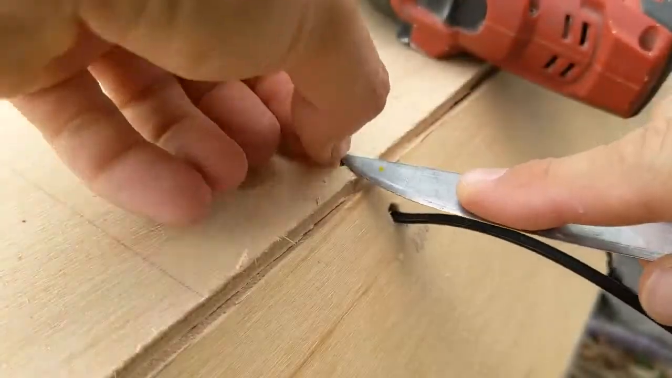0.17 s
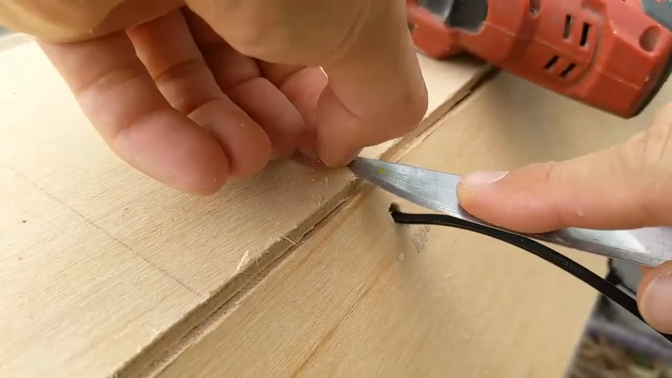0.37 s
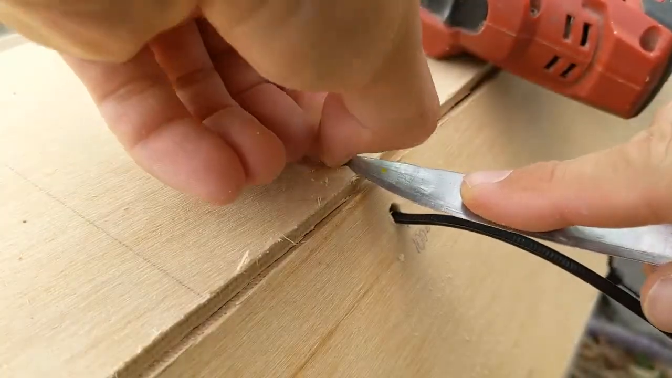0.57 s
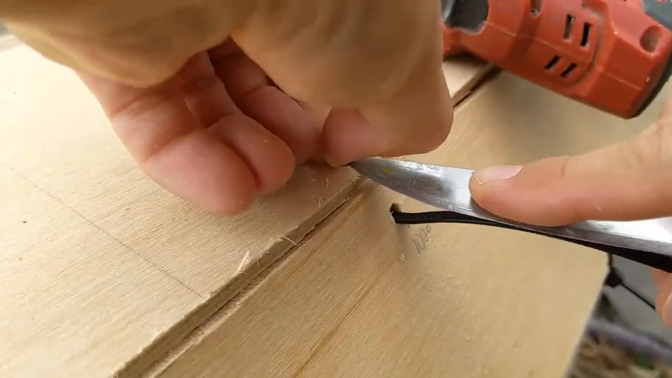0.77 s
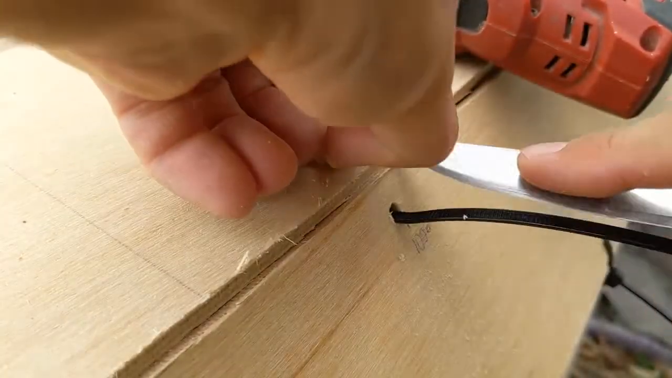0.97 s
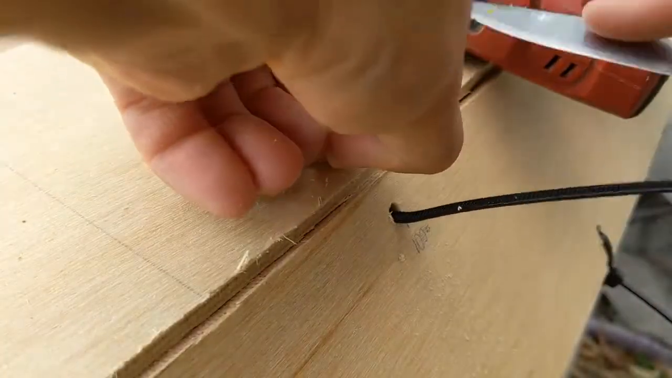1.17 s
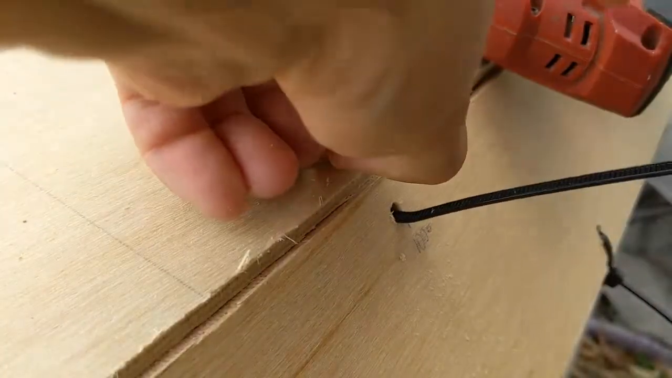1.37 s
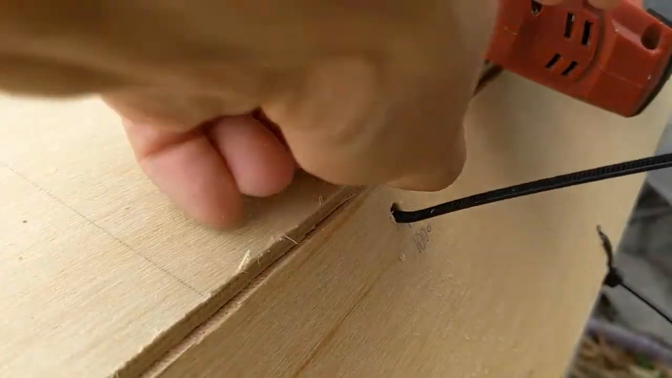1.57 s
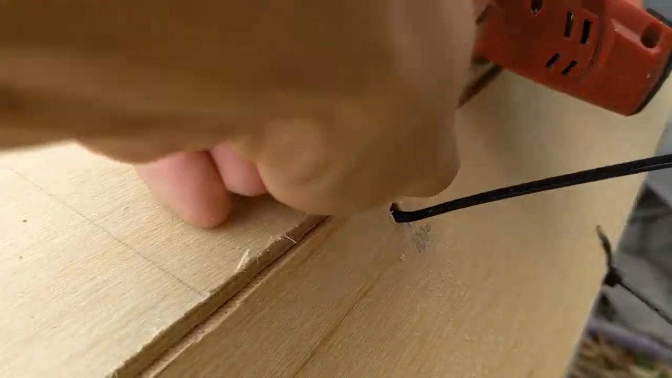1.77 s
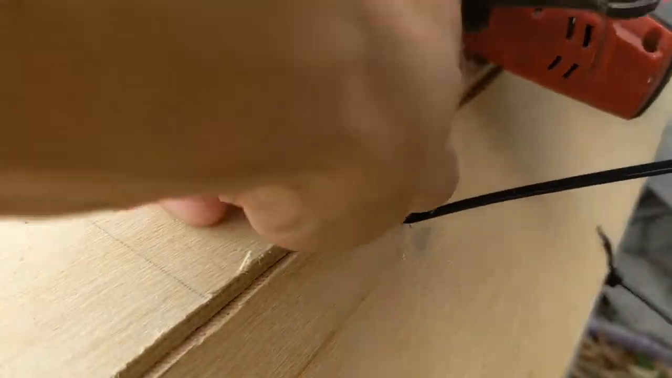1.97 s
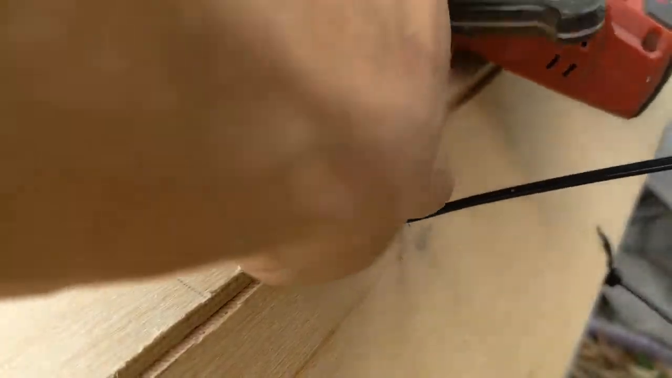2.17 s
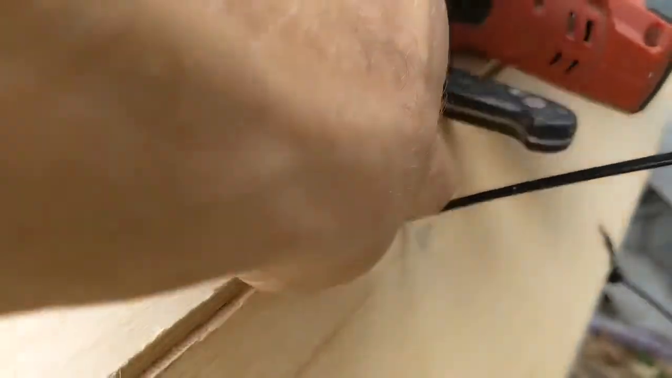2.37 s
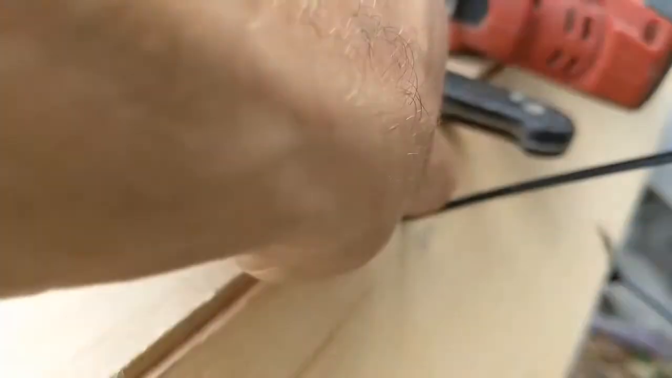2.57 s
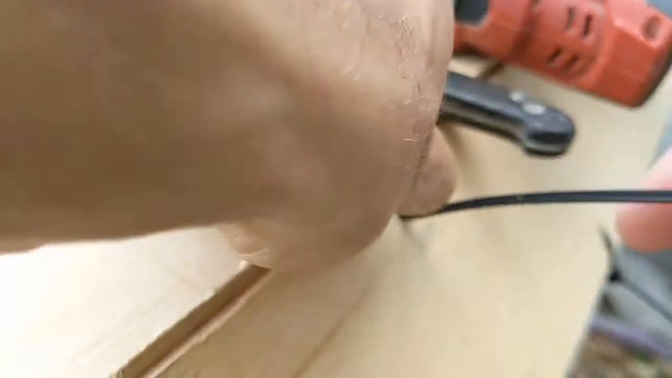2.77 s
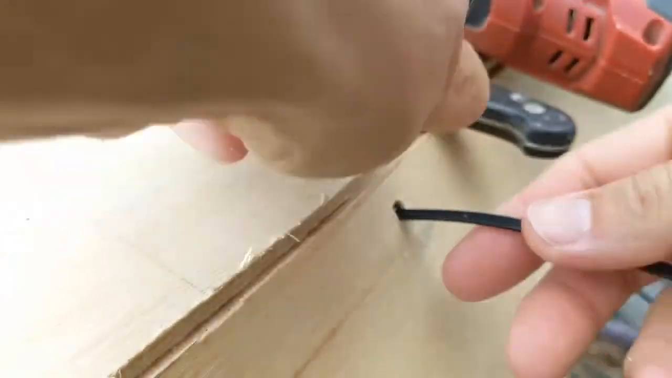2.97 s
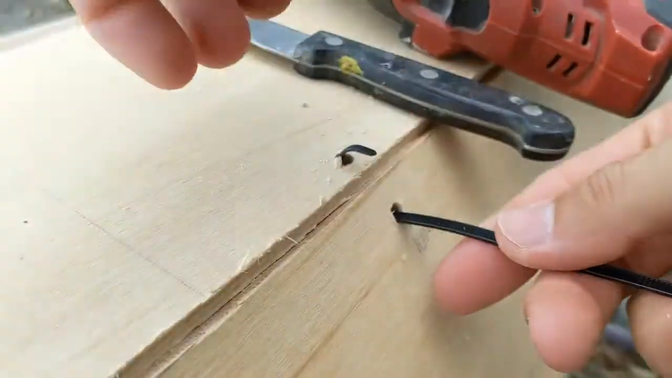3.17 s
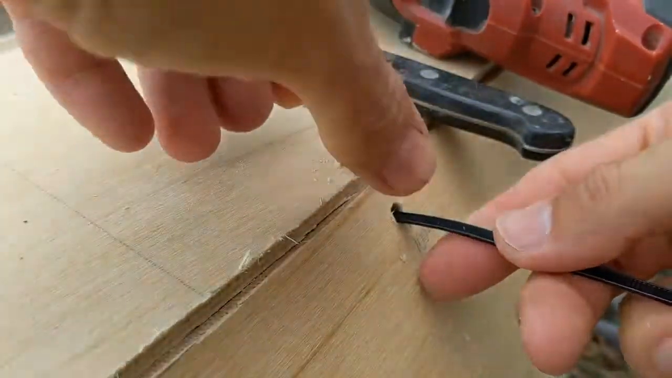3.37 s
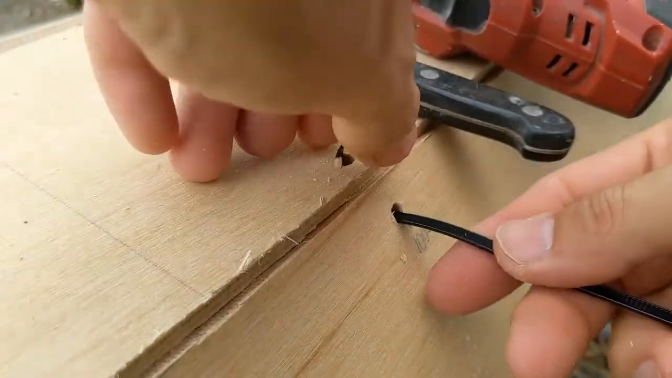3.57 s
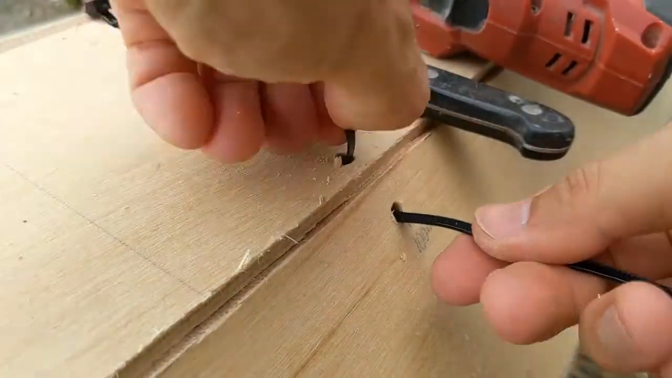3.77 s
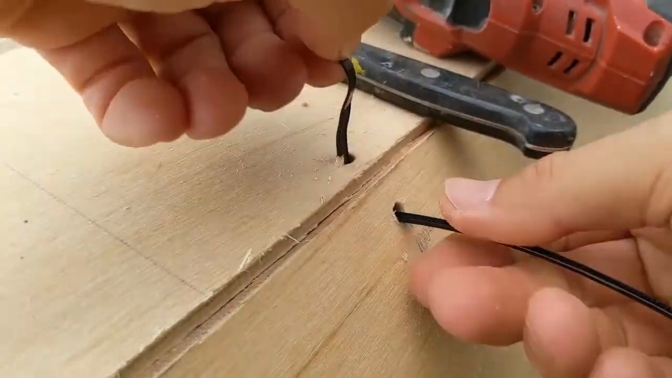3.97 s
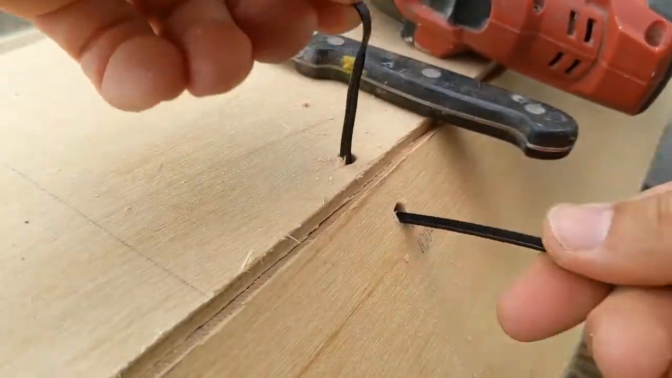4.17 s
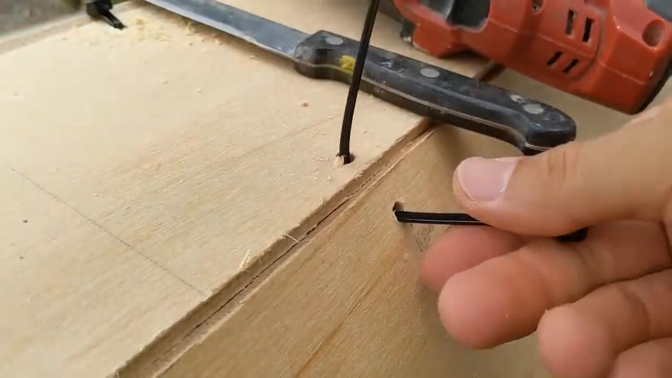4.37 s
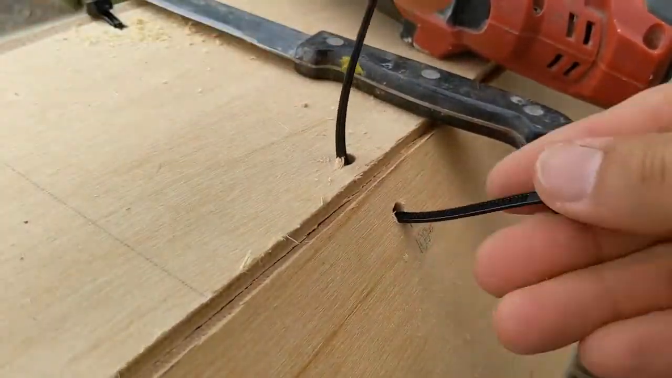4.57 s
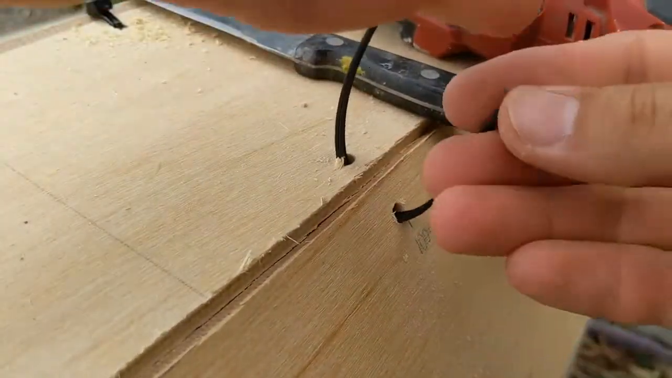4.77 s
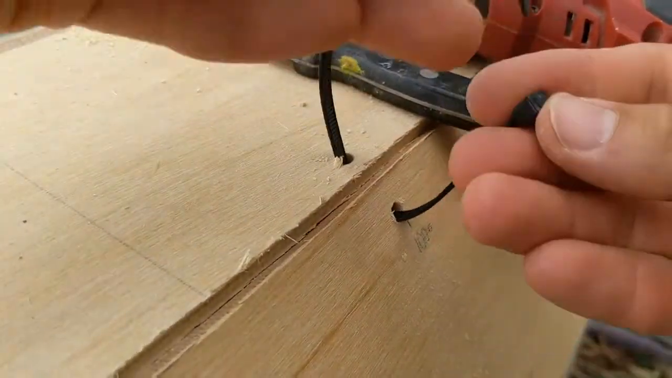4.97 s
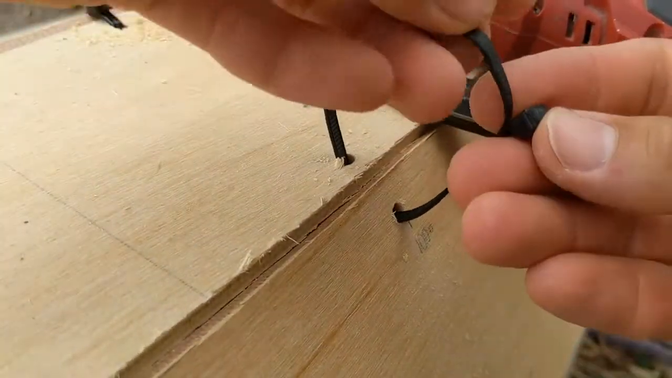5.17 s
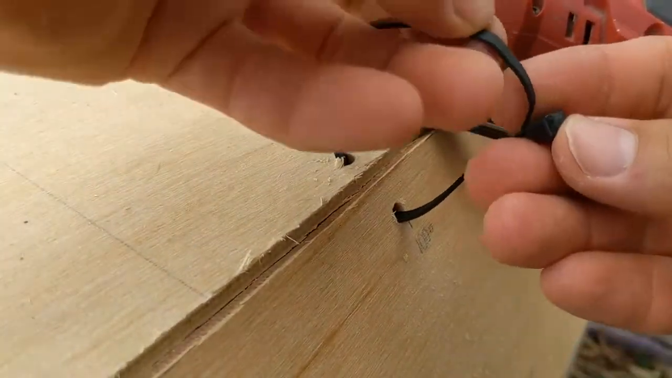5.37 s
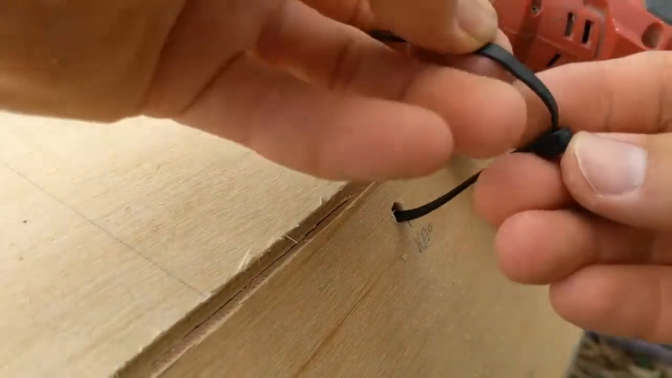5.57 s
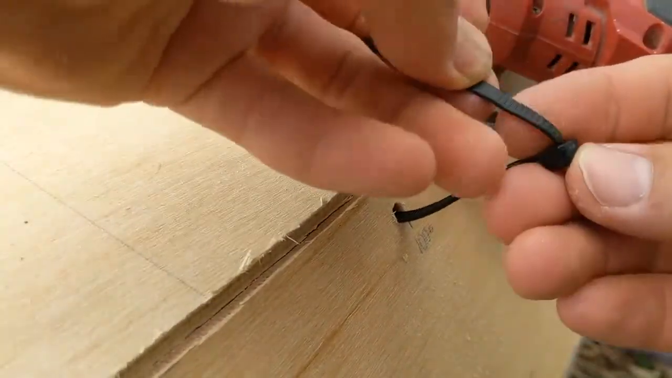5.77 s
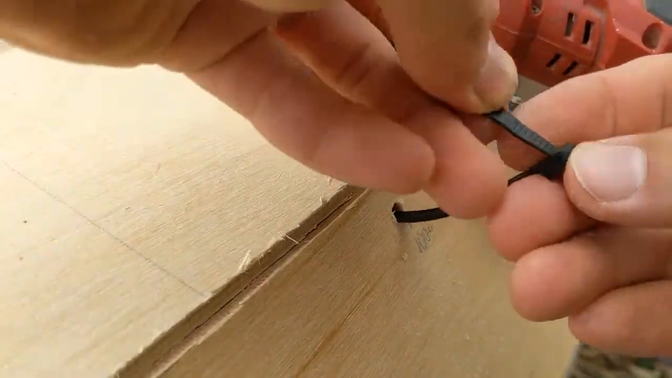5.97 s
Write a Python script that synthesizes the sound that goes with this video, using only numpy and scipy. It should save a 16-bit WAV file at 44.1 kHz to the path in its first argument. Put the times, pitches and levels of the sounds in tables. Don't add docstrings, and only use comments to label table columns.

```python
import sys
import numpy as np
from scipy import signal
from scipy.fft import rfft, irfft, next_fast_len
from scipy.io import wavfile
from scipy.ndimage import map_coordinates

SR = 44100
rng = np.random.default_rng(int(sys.argv[2]) if len(sys.argv) > 2 else 0)


def nominal_scale(level):
    x = np.asarray(level, float) / 20
    return 10 ** x


def generate_wav(sig):
    pcm = np.round(np.clip(np.atleast_2d(sig).T, -1, 1) * 32767).astype(np.int16)
    wavfile.write(sys.argv[1], SR, pcm)


N = 265482

# (frequency [Hz], width [Hz], level [dB])
BOX = [(147, 83, -4), (267, 76, 0.5), (333, 80, 0), (524, 112, -2.5), (730, 227, -5), (1159, 600, -12)]
# (frequency [Hz], width [Hz], level [dB])
PLASTIC = [(2820, 650, 3), (3860, 660, 2), (5750, 275, 2.5)]
# (frequency [Hz], density [dB per Hz])
SIZZLE = [(3000, -23.5), (5000, -5.5), (6500, -9), (7500, -4.5), (10500, -10), (12000, -8.5),
          (15800, -13.5)]
NEAR_LEFT = nominal_scale([[.8], [-.8]])


def unit(x):
    return x / np.sqrt(np.mean(x ** 2) + 1e-20)


def along(points, hz):
    f, v = np.transpose(points)
    return np.interp(np.log(hz + 1), np.log(f + 1), v)


def curves(rows):
    s, *cols = np.transpose(rows)
    t = np.arange(N) / SR
    return [np.interp(t, s, c) for c in cols[:-1]] + [np.interp(t, s, cols[-1], -150, -150)]


def wobble(rate, size=N):
    knots = rng.standard_normal(int(size * rate / SR) + 4)
    return map_coordinates(knots, [np.arange(size) * rate / SR])


def filtered(x, response):
    n = x.shape[-1]
    m = next_fast_len(n + 8192)
    return irfft(rfft(x, m) * response(np.fft.rfftfreq(m, 1 / SR)), m)[..., :n]


def modes(rows):
    def response(f):
        total = 0
        for k, (centre, width, db) in enumerate(rows):
            resonance = 1j * f * width / (centre * centre - f * f + 1j * f * width)
            total = total + (-1) ** k * nominal_scale(db) * resonance
        return total
    return response


def band(rows, lo_hz, hi_hz):
    return lambda f: modes(rows)(f) / (1 + (lo_hz / (f + 1)) ** 4) / (1 + (f / hi_hz) ** 4)


def sizzling(f):
    return nominal_scale(along(SIZZLE, f))


def stereo(response):
    # (frequency [Hz], left-right likeness [0 to 1])
    likeness = [(60, 0.97), (130, 1), (290, 0.31), (640, 0.01), (1410, 0.11), (3100, 0.082), (6820, 0.94),
                (15000, 0.79)]

    def shaped(hz):
        alike = np.clip(along(likeness, hz), -1, 1)
        return response(hz) * np.sqrt((1 + alike * [[1], [-1]]) / 2)

    mid, side = filtered(rng.standard_normal((2, N)), shaped)
    return unit(np.array([mid + side, mid - side]))


def grains(rate, spread_db):
    when, sign, luck = rng.random((3, N))
    size = np.minimum(-np.log(luck + 1e-9), 3.5)
    return unit((when < rate / SR) * np.sign(sign - .5) * nominal_scale(spread_db * size))


def strokes(rows, rest_db=-150, quick=1):
    rise_db_s, fall_db_s = 250 * quick, 170 * quick
    t = np.arange(0, N + 128, 128) / SR
    power = nominal_scale(rest_db) ** 2
    for s, length, db in rows:
        rise = rise_db_s * np.maximum(s - t, 0)
        fall = fall_db_s * np.maximum(t - s - length, 0)
        power = power + nominal_scale(db - rise - fall) ** 2
    return np.interp(np.arange(N) / SR, t, 10 * np.log10(power))


def add(track, s, sound):
    part = track[..., round(s * SR):][..., :sound.shape[-1]]
    part += sound[..., :part.shape[-1]]


def walls(x, slower):
    # (frequency [Hz], T60 [s])
    yard_t60 = [(200, 0.69), (1000, 0.24), (4000, 0.47), (12000, 0.3)]
    hz, t, z = signal.stft(rng.standard_normal((2, 2 * SR // 5)), SR, nperseg=256)
    decay = nominal_scale(-60 * t / (slower * along(yard_t60, hz)[:, None]))
    tail = signal.istft(z * decay, SR, nperseg=256)[1]
    return signal.fftconvolve(x[None], tail / np.linalg.norm(tail[0]), axes=1)


def air():
    # (frequency [Hz], density [dB per Hz])
    spectrum = [(22, -6), (66, -14), (189, -21.5), (672, -22.5), (900, -27.5), (1450, -30.5), (2000, -35),
                (3000, -32.5), (4200, -29.5), (4950, -38.5), (6000, -33.5), (10000, -36), (14500, -40),
                (16000, -42)]
    hum = nominal_scale(-72 + 2.5 * wobble(1.4)) * stereo(modes([(68.8, 9.3, 0)]))
    level = -64 + 0.25 * wobble(2.955)
    return hum + nominal_scale(level) * stereo(lambda f: nominal_scale(along(spectrum, f)))


def bird():
    # (time [s], time to the step up [s], low pitch [Hz], effort below [dB], effort above [dB])
    calls = [(.175, .095, 1420, -64.5, -63), (.485, .095, 1365, -59.5, -63.5),
             (.805, .09, 1325, -58.5, -64), (1.11, .09, 1355, -59.5, -62), (1.4, .14, 1330, -61.5, -65),
             (1.77, .115, 1365, -64, -65.5), (2.105, .105, 1325, -58.5, -65), (2.5, .085, 1370, -62, -63),
             (2.765, .09, 1320, -65, -66.5), (3.06, .07, 1370, -66, -65), (3.32, .09, 1320, -67, -66),
             (3.6, .1, 1305, -66, -67), (3.89, .08, 1310, -69, -78), (4.21, .095, 1330, -69, -68)]
    # (frequency [Hz], level [dB])
    throat = [(1400, -11), (2650, 2.5), (3080, 4), (4100, 5.5), (4600, -2), (5500, -2), (6100, -0.5),
              (7200, -30.5), (8500, -11), (11000, -27)]
    beak_db = [-3, 2, 4, 2, 3]
    upper_s, tired_s, tired_share = .12, 3.85, .5
    upper_hz, wilt_s, wilt_hz_s = 1542, 2.0, 33
    turn_db_s = 1.1
    out = np.zeros((2, N))
    for s, step, low_hz, db, upper_db in calls:
        top_hz = upper_hz - wilt_hz_s * max(s - wilt_s, 0)
        length = step + upper_s * (tired_share if s > tired_s else 1)
        t = np.arange(int(length * SR)) / SR
        bends = [0, .035, step - .025, step + .015, max(length - .065, step + .03), length]
        pitches = [1.025 * low_hz, low_hz, 1.025 * low_hz, top_hz, .985 * top_hz, .89 * top_hz]
        crack = np.interp(t, [step - .01, step + .02], [.009, .026])
        pitch = np.interp(t, bends, pitches) * (1 + crack * wobble(150, len(t)))
        when = [0, step - .035, step - .01, step + .02, length]
        level = np.interp(t, when, [db, db, db - 2.5, upper_db + 1.5, upper_db - 5])
        level = level + np.interp(t / length, [0, .04, .9, 1], [-21, -2.5, 2, -9.5])
        level = level + 1.5 * wobble(25, len(t))
        phase = 2 * np.pi * np.cumsum(pitch) / SR
        call = np.zeros(len(t))
        for k in range(1, 8):
            hoarse = 1 + .42 * wobble(260, len(t))
            opening_db = (k > 2) * (np.interp(t, when, beak_db) + turn_db_s * s)
            call += hoarse * nominal_scale(level + along(throat, k * pitch) + opening_db) * np.sin(k * phase)
        add(out, s, nominal_scale(-4) * np.array([call, np.roll(call, 21)]))
        add(out, s, nominal_scale(2.5) * walls(call, slower=.98))
    return out


def sway():
    # (time [s], length [s], level [dB])
    leans = [(0, .3, -57), (.45, .3, -60), (.92, .9, -58), (2.0, .4, -59), (3.0, .45, -64),
             (4.05, .03, -47), (4.14, .02, -53), (4.31, .03, -51), (4.45, .03, -45), (4.95, .03, -61),
             (5.2, .15, -62), (5.68, .34, -64)]
    rest_db = [-77, -73, -70, -79][2]
    level = strokes(leans, rest_db) + 2.5 * wobble(6) - 4
    return nominal_scale(level) * stereo(modes([(30, 32, -1.5), (68.4, 25, .1)]))


def handling():
    # (time [s], length [s], force [dB], weight on the box [dB], slide of the skin [dB])
    drags = [(.19, .17, -69, -1, -6), (.42, .12, -65, 2, -3), (.96, .07, -64, -5, -1),
             (1.18, .22, -65, -8, -5), (1.5, .35, -67.5, -8, -3.5), (1.91, .04, -66, 1, -8),
             (2.24, .05, -62, 10, -8), (2.33, .08, -65, 2, -3), (2.48, .06, -59, 12, -9),
             (2.66, .3, -71, -2, -4), (3.02, .06, -62, -15, -8), (3.1, .11, -65, -5, 4),
             (3.68, .16, -66, 3, -5), (3.95, .04, -57.5, -2, -5), (4.01, .04, -63, 8, 7),
             (4.12, .06, -62, 12, 0), (4.21, .07, -57, 10, -5), (4.36, .06, -60, 3, 3),
             (4.44, .05, -60, 10, 2), (4.52, .05, -57, 0, -3), (4.62, .05, -63, 5, -11),
             (4.95, .05, -68, 9, -10), (5.4, .12, -63, -3, -9), (5.55, .45, -70, -2, -8)]
    rest_db = [-77, -73, -70, -79]
    rumble_db = strokes([(s, length, db + weight) for s, length, db, weight, _ in drags], rest_db[0])
    scrape_db = strokes([row[:3] for row in drags], rest_db[1])
    hiss_db = strokes([(s, length, db + slide) for s, length, db, _, slide in drags], rest_db[3])
    lumps = wobble(25)
    effort = np.clip((scrape_db + 72) / 14, 0, 1)
    rumble = nominal_scale(rumble_db + 1.1 * lumps) * stereo(band(BOX, 70, 420))
    scrape_db = scrape_db + effort * (2.1 * lumps + 4.1 * wobble(60))
    scrape = nominal_scale(scrape_db) * stereo(band(BOX, 370, 1900))
    slips = unit(filtered(grains(3100, spread_db=7), sizzling))
    hiss = nominal_scale(hiss_db + 1.5 * wobble(30)) * (0.88 * stereo(sizzling) + 0.73 * slips)
    return (rumble + scrape + hiss) * NEAR_LEFT


def picking():
    # (time [s], length [s], level [dB])
    picks = [(.33, .03, -76), (.48, .08, -70), (.75, .13, -77), (1.22, .6, -70), (2.22, .06, -72),
             (2.35, .06, -69), (2.62, .05, -74), (3.1, .1, -78), (3.65, .12, -78), (3.95, .15, -71),
             (4.17, .42, -73), (5.35, .17, -74), (5.83, .04, -76)]
    level = strokes(picks, rest_db=-94) + 7 + 1.5 * wobble(40)
    return nominal_scale(level) * stereo(band([(1920, 2700, -6.0), (3570, 1200, 1)], 1300, 5500)) * NEAR_LEFT


def knocks():
    # (time [s], peak [dB], pitch of the loudest panel [Hz], T60 [s])
    pushes = [(0.171, -50.5, 111, 0.096), (0.413, -36.5, 164, 0.095), (0.881, -54.5, 587, 0.058),
              (1.619, -51.5, 161, 0.11), (1.871, -49, 80.7, 0.066), (2.221, -33.5, 342, 0.04),
              (2.233, -31.5, 556, 0.045), (2.299, -44, 361, 0.11), (2.329, -49.5, 371, 0.24),
              (2.367, -50, 353, 0.1), (2.612, -46, 624, 0.071), (2.656, -49, 80.7, 0.093),
              (3.002, -41.5, 339, 0.06), (3.01, -37, 102, 0.08), (3.045, -41, 167, 0.12),
              (3.634, -46, 94, 0.11), (3.744, -45.5, 297, 0.07), (3.906, -46.5, 160, 0.11),
              (3.949, -49, 146, 0.12), (4.002, -43, 268, 0.22), (4.125, -45.5, 224, 0.18),
              (4.199, -40.5, 162, 0.14), (4.454, -26, 96.9, 0.027), (4.469, -40, 278, 0.074),
              (4.851, -56, 329, 0.088), (4.877, -51, 96.4, 0.073), (5.97, -49, 326, 0.084)]
    out, t = np.zeros((2, N)), np.arange(SR // 5) / SR
    for s, db, hz, t60 in pushes:
        noise = rng.standard_normal(len(t))
        body = unit(filtered(noise, lambda f: modes(BOX)(f) / (1 + 1j * f / 800) ** 2))
        panel = np.sin(2 * np.pi * hz * t) + 0.59 * body
        envelope = nominal_scale(db + 1.5 - 60 * t / max(t60, .01)) * (1 - np.exp(-t / 0.0027))
        add(out, s, envelope * panel * NEAR_LEFT)
    return out


def creak():
    # (time [s], length [s], level [dB])
    pulls = [
        (4.39, .16, -61),
        (4.66, .12, -72),
        (5.135, .02, -63.5),
        (5.4, .12, -67),
        (5.845, .01, -64),
        (5.92, .1, -74),
    ]
    level = strokes(pulls, quick=2.5) + 2.1 * wobble(40)
    return nominal_scale(level) * stereo(band(PLASTIC, 1200, 4600)) * NEAR_LEFT


def squeak():
    # (time [s], pitch [Hz], level [dB])
    glide = [
        (3.8, 10900, -82),
        (3.85, 11900, -78),
        (3.89, 12100, -79),
        (3.97, 11700, -84),
        (3.99, 11500, -93),
    ]
    hz, db = curves(glide)
    return nominal_scale(db + 3 + 3.3 * wobble(80)) * np.sin(2 * np.pi * np.cumsum(hz) / SR)


def teeth():
    # (time [s], teeth a second [Hz], level [dB])
    pull = [
        (4.35, 187.3, -61),
        (4.398, 249.7, -58.5),
        (4.45, 252.2, -60),
        (4.48, 293.7, -55.5),
        (4.526, 189.3, -65),
        (4.55, 180.7, -59.5),
    ]
    rate, db = curves(pull)
    passed = np.cumsum(rate * (1 + 0.01005 * wobble(120))) / SR
    ticks = np.diff(np.floor(passed), prepend=0)
    edge = [(252, 79, -0.41), (550, 116, 0.24), (740, 190, -1.1)]  # (frequency [Hz], width [Hz], level [dB])
    uneven = ticks * nominal_scale(0.87 * wobble(250))
    buzz = unit(filtered(uneven, lambda f: modes(edge)(f) / (1 + 1j * f / 1100) ** 2))
    return nominal_scale(db + 7.5) * buzz


def pawl():
    # (time [s], peak [dB])
    slips = [(5.3038, -65), (5.3348, -57), (5.3552, -57), (5.3847, -51), (5.4041, -49), (5.4216, -47),
             (5.4314, -56), (5.4655, -51.5), (5.4999, -48), (5.5114, -53), (5.8401, -51)]
    out, t = np.zeros((2, N)), np.arange(SR // 30) / SR
    for s, db in slips:
        noise = rng.standard_normal(len(t))
        tick = unit(filtered(noise, lambda f: modes([(3000, 2300, 0)])(f) ** 2)) * nominal_scale(-60 * t / .02)
        add(out, s, nominal_scale(db - 5.5) * tick * NEAR_LEFT)
    return out


def snaps():
    # (time [s], peak [dB], thud [dB], sizzle [dB], pitch of the free end [Hz])
    releases = [(0.413, -41, -1.5, -7.5, 3800), (0.4877, -48.5, -7, -28, 2820),
                (0.8346, -61.5, 4.5, -1, 4020), (0.8794, -46, -4, -12.5, 4130),
                (0.8804, -50.5, -19, -30, 1500), (3.0027, -41, 2.5, 4, 5790), (3.0471, -37, -3, -12, 5600),
                (3.1017, -31.5, -4, 0.5, 3640), (3.236, -48, -0.5, -4, 3720), (3.9884, -56, 8, -2.5, 3970),
                (4.0372, -36, -3.5, 1, 3790), (4.5725, -46, 0, -36.5, 5750), (4.66, -62.5, -5, 4.5, 4030),
                (4.7607, -56, 1, -3, 3940), (4.8822, -64, 8, -6, 3600), (4.9367, -45.5, -7.5, -8.5, 3050),
                (5.0662, -59, 8, -22.5, 4110), (5.9238, -41.5, 0.5, -1.5, 5880)]
    out, t = np.zeros((2, N)), np.arange(SR // 6) / SR
    for s, db, thud_db, sizzle_db, hz in releases:
        t60 = max(.032 - .0006 * (db + 50), .005)
        attack = 1 - np.exp(-t / (0.02 * t60))

        def burst(life, response):
            noise = unit(filtered(rng.standard_normal(len(t)), response))
            return noise * nominal_scale(-60 * t / life) * attack

        snap = burst(t60, modes([(hz, 0.055 * hz, .1)])) + nominal_scale(-1.5) * burst(t60, modes(PLASTIC))
        snap = snap + nominal_scale(sizzle_db + 5.5) * burst(1.1 * t60, sizzling)
        snap = nominal_scale(db - 3.5) * (snap + nominal_scale(thud_db) * burst(2.5 * t60, modes(BOX)))
        add(out, s, snap * nominal_scale([[1.2], [-1.2]]))
        add(out, s, nominal_scale(0.5) * walls(snap, slower=0.47))
    return out


def knife():
    # (frequency [Hz], level [dB], T60 [s])
    lid_modes = [(95.7, -30, 0.05), (335, -17, 0.13), (390.2, -18, 0.18), (501, -15.5, 0.11),
                 (654.5, -5, 0.058), (740, -3.5, 0.068), (781, -6.5, .09), (992, -10, 0.047),
                 (1100, -1.5, 0.035), (1388, -13.5, 0.034), (1690, -4.5, 0.023), (2410, -9, 0.026),
                 (2850, -31.5, 0.0067), (3470, -6.5, .022), (3280, -7.5, .028), (3640, -8.5, .022),
                 (3750, -14, 0.013)]
    # (frequency [Hz], half of left over right [dB])
    lid_pan = [(300, 1), (750, 1.2), (1100, 2.9), (2400, -.3), (3500, -1)]
    drop_s, drop_db = 2.4612, -4.4
    t = np.arange(SR // 3) / SR
    ring = np.zeros((2, len(t)))
    for hz, level, t60 in lid_modes:
        side_db = along(lid_pan, hz) * np.array([[1], [-1]])
        ring += nominal_scale(level + side_db - 60 * t / t60) * np.sin(2 * np.pi * hz * t)
    blade = modes([(1420, 810, -5), (3550, 910, -1.6), (5795, 1400, -8)])
    decay = nominal_scale(-6.5 - 60 * t / 0.024) + nominal_scale(-13.5 - 60 * t / 0.36)
    rattle = decay * unit(filtered(rng.standard_normal((2, len(t))), blade))
    blow = ring * (1 - np.exp(-t / 0.00096)) + nominal_scale(-9.5) * rattle
    soft = filtered(ring, lambda f: 1 / (1 + 1j * f / 1200) ** 2)
    out = np.zeros((2, N))
    add(out, drop_s - .0022, nominal_scale(drop_db - 36) * soft)
    add(out, drop_s, -nominal_scale(drop_db - 5.5) * blow)
    add(out, drop_s + .0155, nominal_scale(drop_db - 25.5) * soft)
    add(out, drop_s + .004, nominal_scale(drop_db - 21.5) * walls(blow.mean(0), slower=0.83))
    return out


def scene():
    background = air() + bird() + sway()
    hands = handling() + picking() + knocks()
    strap = creak() + squeak() + teeth() + pawl() + snaps()
    return background + hands + strap + knife()


def roll_off(x):
    return signal.sosfilt(signal.butter(12, 16800, fs=SR, output="sos"), x)


def record(dry):
    mix = filtered(dry, lambda hz: hz < 15920)
    return roll_off(mix)


dry = scene()
out = record(dry)
generate_wav(out)
```